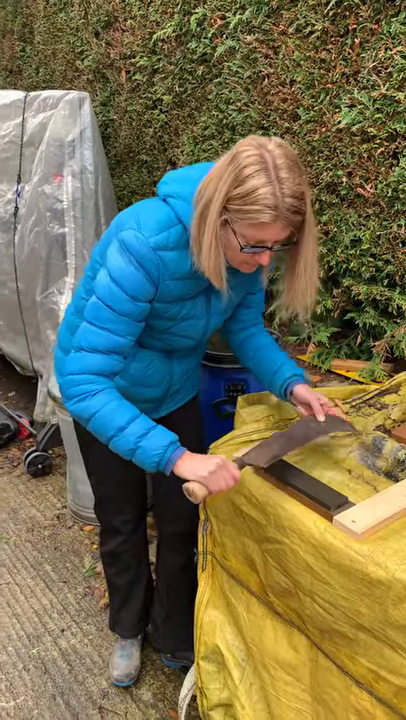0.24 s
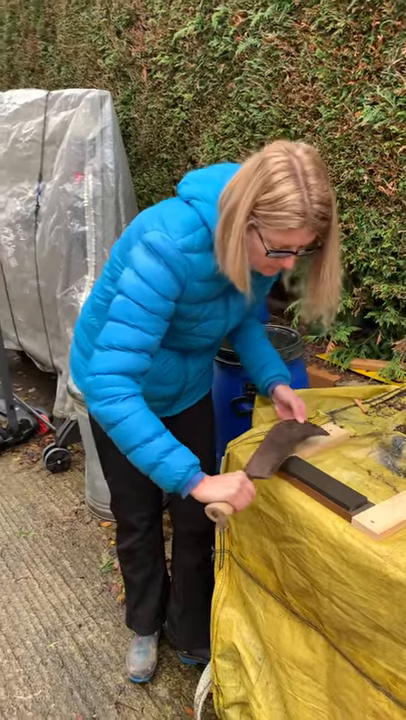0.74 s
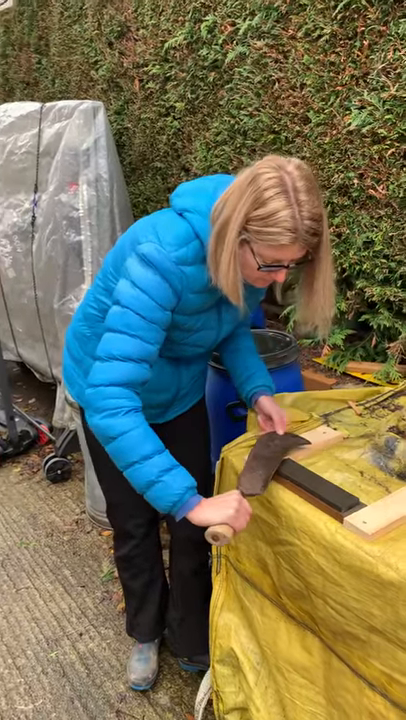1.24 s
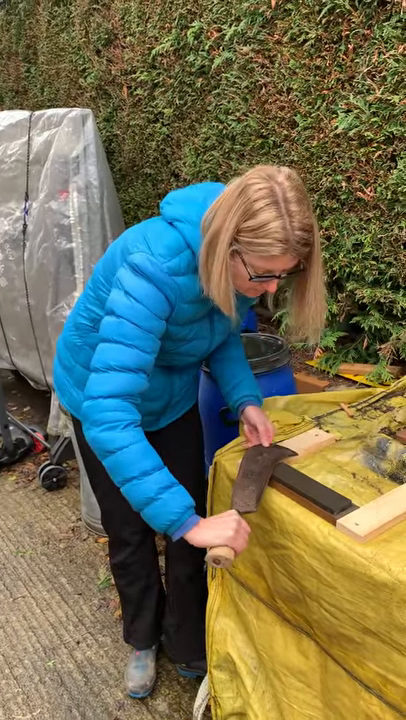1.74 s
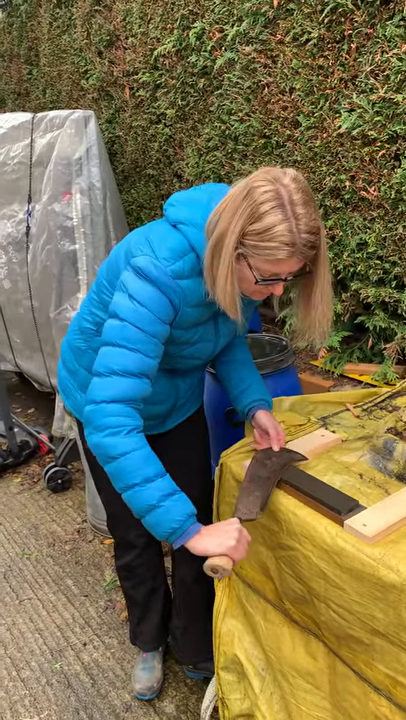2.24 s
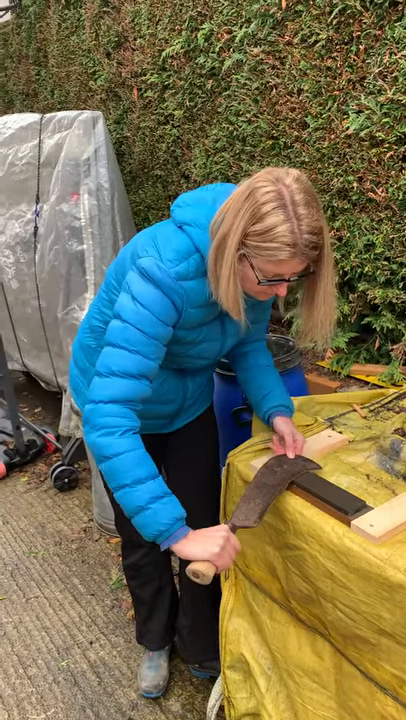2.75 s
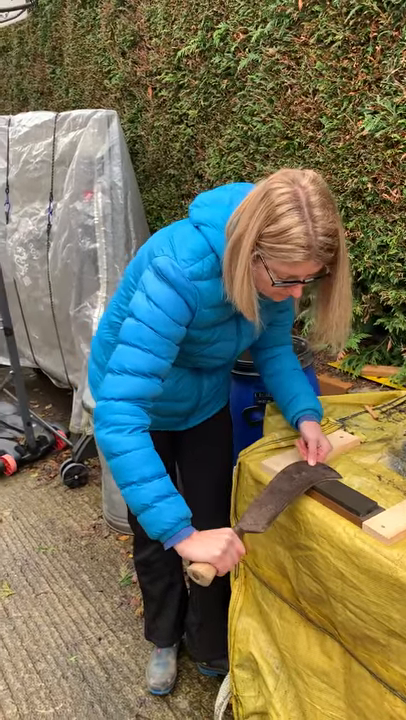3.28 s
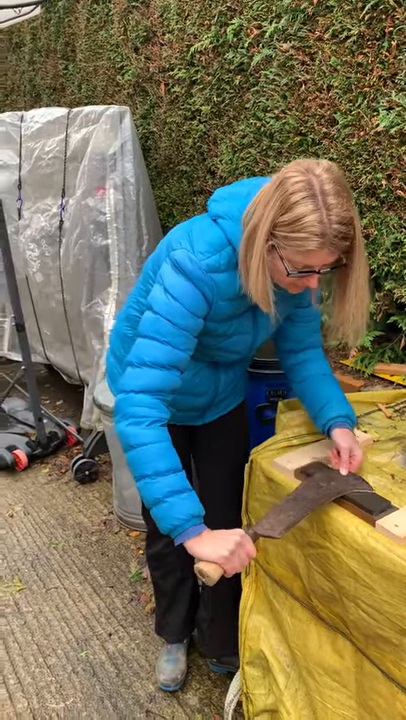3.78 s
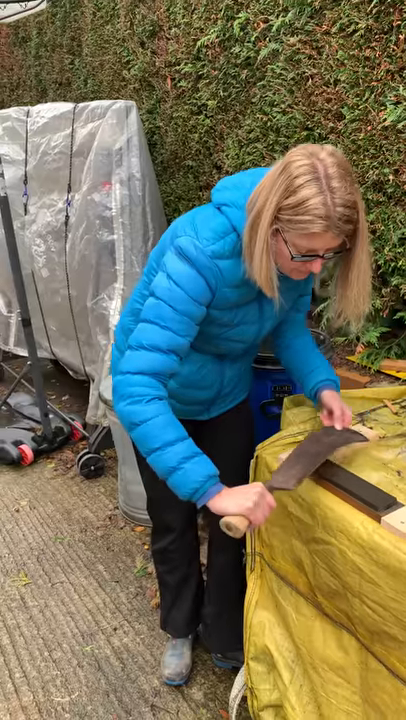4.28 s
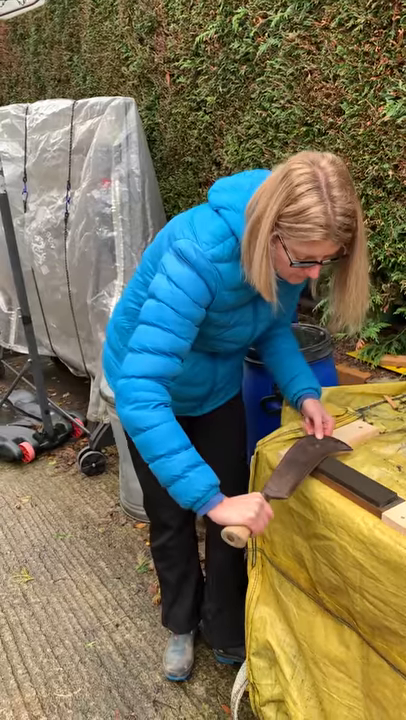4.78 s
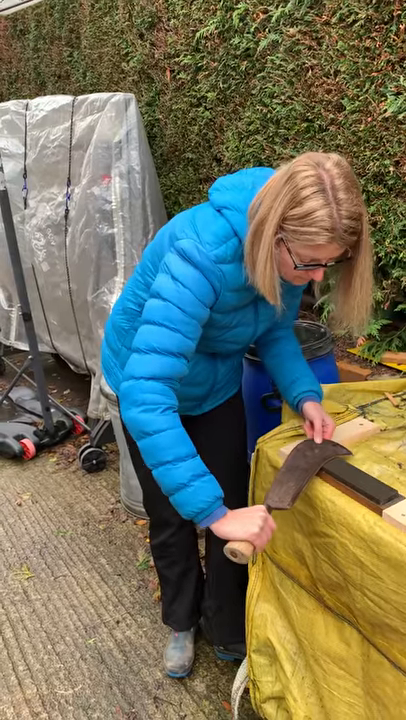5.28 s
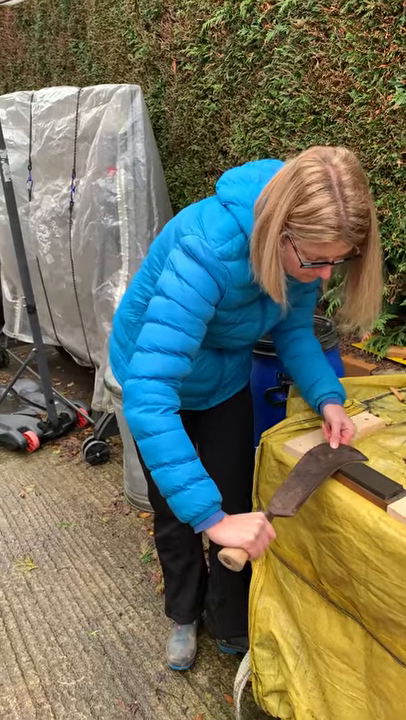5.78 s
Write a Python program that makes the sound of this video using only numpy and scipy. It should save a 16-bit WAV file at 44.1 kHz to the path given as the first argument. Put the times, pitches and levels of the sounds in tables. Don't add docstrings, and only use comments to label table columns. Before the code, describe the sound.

In a quiet yard with low traffic drone and soft hiss, a small bird chirps thinly. A steel blade clacks onto a sharpening stone, shifts lightly, then scrapes in short pushes that build into a long, bright, gritty rasp with metallic ringing and catches. After a brief gap and another chirp, a softer landing begins a second pass that grows loud. Close stereo phone pickup, dry open air with a very short echo.

```python
import sys
import numpy as np
from scipy import signal
from scipy.fft import rfft, irfft, next_fast_len
from scipy.io import wavfile
from scipy.ndimage import uniform_filter1d, map_coordinates

SR = 44100
rng = np.random.default_rng(int(sys.argv[2]) if len(sys.argv) > 2 else 0)


def elevation(decibels):
    levels = np.asarray(decibels, float)
    return 10 ** (levels / 20)


def generate_wav(sig):
    pcm = np.round(np.clip(np.atleast_2d(sig).T, -1, 1) * 32767).astype(np.int16)
    wavfile.write(sys.argv[1], SR, pcm)


N = 265702
TOP_HZ = 15720


def unit(x):
    return x / np.sqrt(np.mean(x ** 2) + 1e-20)


def along(points, hz):
    f, v = np.transpose(points)
    return np.interp(np.log(hz + 1), np.log(f + 1), v)


def curves(rows, silent=None):
    s, *cols = np.transpose(rows)
    return [np.interp(np.arange(N) / SR, s, c, silent, silent) for c in cols]


def wobble(rate):
    knots = rng.standard_normal(int(N * rate / SR) + 4)
    return map_coordinates(knots, [np.arange(N) * rate / SR])


def filtered(x, response):
    m = next_fast_len(N + 8192)
    return irfft(rfft(x, m) * response(np.fft.rfftfreq(m, 1 / SR)), m)[..., :N]


def narrow(hz, width):
    m = next_fast_len(N)
    f = np.fft.rfftfreq(m, 1 / SR)
    random_phase = 2j * np.pi * rng.random(len(f))
    return unit(irfft(np.exp(-((f - hz) / width) ** 2 + random_phase), m)[:N])


def ringing(force, modes, hollows, lo, hi):
    f = np.fft.rfftfreq(4096, 1 / SR)

    def mode(c, w):
        return 1j * f * w / (c * c - f * f + 1j * f * w)

    h = sum((-1) ** k * elevation(db) * mode(c, w) for k, (c, w, db) in enumerate(modes))
    for c, w, depth in hollows:
        h = h * (1 - np.clip(depth, 0, 1) * mode(c, w))
    in_band = (f > lo) & (f < hi)
    h = h / np.sqrt(np.sum(np.abs(h[in_band]) ** 2) / len(f))
    return signal.oaconvolve(force, irfft(h))[:N]


def tail(t60s, seconds):
    hz, t, z = signal.stft(rng.standard_normal((2, int(SR * seconds))), SR, nperseg=256)
    decay = elevation(-60 * t / along(t60s, hz)[:, None])
    echo = signal.istft(z * decay, SR, nperseg=256)[1]
    return echo / np.linalg.norm(echo[0])


# freq_hz, level_db per Hz
HISS = [(200, 9), (700, 4.5), (1600, 0.5), (2800, -6), (4800, -4.5), (8000, -4.5), (12500, -7.5),
        (15000, -11), (16000, -19.5)]
# freq_hz, likeness (0-1, below 0 counts as 0)
HISS_ALIKE = [(300, 0.075), (1000, -0.49), (2000, 0.28), (3500, -0.012), (4500, 0.93), (16000, 0.95)]


def hiss():
    def alike(hz):
        return np.clip(along(HISS_ALIKE, hz), 0, 1)

    shared, own = rng.standard_normal(N), rng.standard_normal((2, N))
    shared = filtered(shared, lambda hz: elevation(along(HISS, hz)) * np.sqrt(alike(hz)))
    own = filtered(own, lambda hz: elevation(along(HISS, hz)) * np.sqrt(1 - alike(hz)))
    return elevation(-74.5) * shared, elevation(-73.5) * own


# time_s, level_db
ROAD = [(0.0, -59.5), (0.28, -52.5), (0.59, -62), (0.69, -55), (1.07, -42), (1.34, -52.5), (1.78, -51.5),
        (2.52, -57), (3.34, -55.5), (3.46, -57), (3.56, -50.5), (3.82, -65.5), (4.19, -54.5), (4.8, -52.5),
        (5.2, -55), (5.5, -50.5), (5.72, -55.5), (6.02, -46)]
# freq_hz, level_db per Hz
DRONE = [(150, -39.5), (200, -11.5), (242, 0), (293, -7), (335, -22.5), (430, -27), (531, -41),
         (680, -71.5), (900, -87.5)]
# freq_hz, level_db per Hz
RUMBLE = [(15, -60), (25, -23.5), (50, -6.5), (84, 0.5), (150, 0), (200, -6), (300, -31), (500, -86.5)]


def road():
    drone_db, = curves(ROAD)
    lull = np.exp(-((np.arange(N) / SR - 3.91) / 0.64) ** 2)
    rumble_db = -57 - 6.5 * lull + 2.5 * wobble(4.0)
    throb = elevation(1.8 * wobble(22.01))
    drone = unit(filtered(rng.standard_normal(N), lambda hz: elevation(along(DRONE, hz))) * throb)
    rumble = unit(filtered(rng.standard_normal(N), lambda hz: elevation(along(RUMBLE, hz))))
    colours = lambda hz: elevation([along(DRONE, hz), along(RUMBLE, hz)])
    stray = filtered(rng.standard_normal((2, N)), colours)
    apart = np.array([[1], [-1]])
    drone = drone * elevation(.9 * apart) + elevation(-22) * unit(stray[0]) * apart
    rumble = rumble + elevation(-22) * unit(stray[1]) * apart
    return elevation(drone_db + 2.0) * drone + elevation(rumble_db + 2.5) * rumble


# centre_s, length_s, pitch_hz, width_hz, level_db
FAINT = [
    (.17, .3, 3650, 150, -93),
    (.16, .1, 4300, 300, -91),
    (4.14, .09, 1100, 450, -81),
    (4.51, .05, 1250, 250, -84),
]


def faint():
    t, sound = np.arange(N) / SR, np.zeros(N)
    for s, length, hz, width, db in FAINT:
        swell = np.exp(-(2 * (t - s) / length) ** 4)
        sound += elevation(db) * swell * narrow(hz, width)
    return sound


# time_s, pitch_hz, level_db
BIRD = [
    [(0.415, 5480, -80), (0.425, 5290, -57), (0.446, 5360, -54), (0.469, 5360, -54.5), (0.478, 5300, -57.5)],
    [(4.63, 5300, -86), (4.644, 5236, -64), (4.672, 5310, -57.5), (4.694, 5270, -60), (4.70, 5340, -61)],
]
RASP_DB = [-8, -8]


def bird():
    call, t = np.zeros(N), np.arange(N) / SR
    rasp = narrow(hz=5310, width=400)
    for rows, rasp_db in zip(BIRD, RASP_DB):
        hz, db = curves(rows)
        start, end = rows[0][0], rows[-1][0]
        open_bill = np.clip((end + .006 - t) / .006, 0, 1) * (t > start)
        rasp_swell = np.exp(-((t - end - .03) / 0.041) ** 2) * (t > start)
        call += open_bill * elevation(db + 11.0) * np.sin(2 * np.pi * np.cumsum(hz) / SR)
        call += elevation(db + rasp_db + 9.5) * rasp_swell * rasp
    echo = signal.fftconvolve(call[None], tail([(5000, 0.45)], .7), axes=1)[0, :N]
    wall = elevation(-6 + 3.0 * wobble(90)) * np.roll(call, round(0.072 * SR))
    tick = elevation(-55 - 60 * np.abs(t - .4255) / 0.0023) * rng.standard_normal(N)
    tick_colour = [(4000, -30), (4800, 3.5), (8000, -5), (9000, -25)]  # freq_hz, level_db
    tick = filtered(tick, lambda hz: elevation(along(tick_colour, hz)))
    return 0.41 * (call + wall) + elevation(-13.5) * echo + tick


# freq_hz, t60_s
YARD = [(300, 0.046), (2000, 0.18), (6000, 0.13), (12000, 0.084)]


def yard(steel):
    late = np.pad(steel, (500, 0))[None]
    return elevation(-15.5) * signal.fftconvolve(late, tail(YARD, .3), axes=1)[:, :N]


# start_s, peak_db, length_s
BURSTS = [(2.153, -63, 0.01), (2.216, -57, 0.013), (2.36, -62, 0.01), (2.392, -55, 0.01),
          (2.434, -49, 0.01), (2.643, -69, 0.0092), (2.768, -54, 0.01), (2.862, -55, 0.011),
          (2.94, -57, 0.01), (2.97, -57, 0.01), (3.007, -42, 0.01), (3.068, -51, 0.01), (3.1453, -60, 0.01),
          (3.249, -48, 0.011), (3.296, -50, 0.01), (3.45, -47, 0.01), (3.476, -45, 0.01),
          (4.89, -69, 0.011), (4.9187, -57.5, 0.01), (5.05, -65, 0.01), (5.1332, -66, 0.01),
          (5.157, -61, 0.012), (5.212, -48, 0.0089), (5.262, -63, 0.01), (5.285, -65, 0.01),
          (5.314, -53, 0.01), (5.432, -70, 0.01), (5.4445, -59, 0.0092), (5.6291, -48, 0.01),
          (5.819, -50.5, 0.0092), (5.882, -51, 0.0089), (5.8925, -48, 0.01), (5.9374, -42, 0.011),
          (6.002, -44.5, 0.01)]
# freq_hz, width_hz, level_db
BURST = [(1800, 1500, -5), (4100, 1800, -3), (7200, 2500, 0), (11400, 2500, -0.5), (13600, 2000, -2)]
# start_s, level_db, rattle_s, thud_db (re rattle)
LANDINGS = [
    (1.7572, -43.5, 0.011, -5),
    (4.7755, -52.5, 0.0048, -2.5),
]
# freq_hz, width_hz, level_db
SLAP = [(990, 500, -6.5), (1690, 400, -2.5), (2840, 330, 7), (3900, 390, -2.5), (5900, 580, -11.5),
        (7300, 600, -20)]
# freq_hz, width_hz, level_db
THUD = [(330, 140, 0), (630, 350, -6.5), (1300, 700, -9.5)]


def impacts():
    force, t = np.zeros((3, N + SR)), np.arange(SR // 10) / SR
    for s, db, length in BURSTS:
        crumble = elevation(db - 7.5 - 8.7 * t / length)
        force[0, round(s * SR):][:len(t)] += crumble * rng.standard_normal(len(t))
    for s, db, rattle, thud_db in LANDINGS:
        rattling = elevation(db - 7.2 * (t / rattle) ** 3)
        thudding = elevation(db + thud_db - 60 * t / 0.12)
        force[1, round(s * SR):][:len(t)] += rattling * rng.standard_normal(len(t))
        force[2, round(s * SR):][:len(t)] += thudding * rng.standard_normal(len(t))
    burst, slap, thud = force[:, :N]
    sound = ringing(burst, BURST, [], 7100, 15500)
    sound += ringing(slap, SLAP, [], 800, 4500)
    return sound + ringing(thud, THUD, [], 200, 1500)


def grit(per_s, spread_db, fine, clump_db, patchy_db):
    chance, size, sign = rng.random((3, N))
    snags = (chance < per_s / SR) * elevation(-spread_db * np.log(size + 1e-4)) * np.sign(sign - .5)
    rub = elevation(clump_db * wobble(120)) * (unit(snags) + fine * rng.standard_normal(N))
    z = signal.stft(rub, nperseg=512)[2]
    field = uniform_filter1d(uniform_filter1d(rng.standard_normal(z.shape), 5, 0), 12, 1)
    return unit(signal.istft(z * elevation(patchy_db * unit(field)), nperseg=512)[1][:N])


FULL_SPEED_DB = -50
# time_s, edge_db (speed as hiss), body_db (weight re hiss)
SETTLE = [
    [(1.72, -106, 14), (1.755, -82, 8), (1.758, -56, 1), (1.772, -70, 5), (1.807, -74.5, 2),
     (1.877, -84.5, 6)],
    [(1.879, -87, 1), (1.917, -72, -9), (1.945, -98, -13), (1.955, -72, -9), (1.995, -92, 1),
     (2.105, -102, -1)],
]
SHORT_PUSHES = [
    [(2.11, -83, -1), (2.154, -62, -1), (2.17, -62.5, 6.5), (2.184, -55, 3), (2.26, -68.5, -3),
     (2.306, -88, -13), (2.31, -80, -5)],
    [(2.312, -84, -2), (2.324, -70, 0), (2.378, -55.5, 1.5), (2.386, -59, 6), (2.456, -53, 0),
     (2.514, -65.5, 6.5), (2.598, -100, -10)],
    [(2.6, -104, -4), (2.634, -69, 0.5), (2.702, -61, 8), (2.842, -54, 0.5), (2.902, -59.5, -5),
     (2.91, -72, -1), (2.98, -55.5, -11)],
]
LONG_DRAW = [
    [(2.982, -62.5, -0.5), (3.016, -45, -10), (3.036, -53.5, 1), (3.086, -49.5, -2), (3.132, -57, -2),
     (3.26, -50, -1), (3.274, -54.5, 0.5), (3.318, -49, -1), (3.44, -50, -4)],
    [(3.442, -50, 1), (3.5, -42, -6.5), (3.682, -46.5, -3.5), (3.752, -52.5, -10), (3.836, -49, -14),
     (3.856, -81.5, -29), (3.882, -85, -28), (3.93, -99.5, -2)],
]
SECOND_PASS = [
    [(4.778, -58.5, 4.5), (4.796, -63, 1), (4.81, -61, -4), (4.896, -65, -1), (4.925, -55.5, -6),
     (5.044, -71, 1), (5.102, -62.5, -0.5), (5.32, -57.5, 0), (5.376, -67, 5.5)],
    [(5.378, -77, 1), (5.41, -60.5, 0.5), (5.482, -44.5, -5.5), (5.59, -50, 0.5), (5.7, -47, 1),
     (5.74, -51, 0.5), (5.93, -52, 1), (5.996, -55.5, -1), (6.025, -49.5, 2.5)],
]
BENCH_DB = [-0.5, -1.5, -4.5, -2, -2, 0.5, -6.5]
FINEST_DB = [-16.5, -13, -16.5, -10, -22.5, -16, -13.5]


def strokes(place):
    rub = np.zeros((4, N))
    rub[0] = grit(per_s=2500, spread_db=-0.5, fine=3.2, clump_db=1.6, patchy_db=2.5)
    rub[1] = grit(per_s=2900, spread_db=2.0, fine=1.03, clump_db=1.3, patchy_db=3.0)
    rub[2] = rng.standard_normal(N)
    rub[3] = rub[0]
    pressure = np.zeros((4, N))
    for rows in SETTLE + SHORT_PUSHES + LONG_DRAW + SECOND_PASS:
        edge_db, body_db = curves(rows)
        speed_db = edge_db - FULL_SPEED_DB
        bench_db = np.interp(place, range(len(BENCH_DB)), BENCH_DB) + body_db - 0.19 * speed_db
        top_db = np.interp(place, range(len(FINEST_DB)), FINEST_DB) - 0.036 * speed_db
        touching, = curves(np.c_[np.array(rows)[:, 0], np.ones(len(rows))], silent=0)
        shares_db = np.array([0 * edge_db, body_db - 2.5, bench_db, top_db])
        pressure += touching * elevation(edge_db + shares_db)
    return rub * pressure, pressure[0]


# start_s, peak_db, weight_db (re edge)
CATCHES = [(1.7577, -47.5, 7.5), (1.8903, -65, 3), (1.9128, -56.5, 2), (1.9535, -62, -19),
           (2.0476, -65, -19), (2.1774, -49.5, 5.5), (2.327, -59.5, 3), (2.6338, -64, -10),
           (2.7031, -42.5, -11), (2.8285, -38.5, -10), (2.8937, -55, -15), (3.0145, -39.5, -5),
           (3.068, -38.5, -4.5), (3.252, -28.5, -9), (3.3184, -35, -11.5), (3.5279, -39, -9),
           (3.5403, -32, -1), (3.5762, -31, -4.5), (3.8294, -37, -6.5), (4.7759, -45.5, 4),
           (4.8518, -49, -14), (4.9096, -40.5, -11), (5.3971, -56.5, -2), (5.475, -45, -16),
           (5.7194, -34.5, -1), (5.8192, -33, -8), (5.8922, -32, -32), (5.9369, -34, -23),
           (6.0038, -30.5, -14.5)]


def catches():
    force, t = np.zeros((6, N + SR)), np.arange(SR // 20) / SR
    for s, db, body_db in CATCHES:
        top_db = -19.5 - 0.28 * (db - FULL_SPEED_DB)
        chatter = elevation(-60 * t / 0.022) * rng.standard_normal((6, len(t)))
        shares_db = [-5, body_db - 11, body_db - 17.5, top_db, body_db - 10.5, top_db + 0.5]
        force[:, round(s * SR) - 30:][:, :len(t)] += elevation(db + np.array(shares_db))[:, None] * chatter
    return force[:, :N]


# time_s, place (0 heel, 1 belly, 2 bend, 3 tip; 4-6 heel, belly, bend, steeper)
CONTACT = [(1.7, 0.017), (2.28, 0.15), (2.36, 0.97), (2.9, 1.7), (3.05, 2.02), (3.4, 2.16), (3.5, 3.05),
           (3.9, 2.81), (4.7, 4.02), (5.05, 4.02), (5.2, 5.06), (5.38, 5.2), (5.46, 5.7), (5.75, 6.02),
           (6.03, 5.94)]
# freq_hz, width_hz, heel_db, belly_db, bend_db, tip_db
BLADE = [(884, 49, 10.5, 6.5, 1.5, -19), (1091, 27, -21, -16, 11.5, 7), (1452, 180, 17.5, 5, 6.5, -4.5),
         (1686, 46, 18.5, 8, 12, 6), (2156, 99, -16, 9.5, 14.5, 3.5), (2896, 46.5, 27.5, 4, 15.5, 2),
         (3330, 700, -7, -6, -9, -4), (3640, 35, -1, 4.5, 9, -4.5), (3846, 70, 17, 12, 5, 10),
         (4344, 66, -7, 3.5, 2.5, 6.5), (5140, 69, -1, 6, -0.5, -6), (5040, 200, 2, 9.5, 7.5, 13),
         (5254, 150, 0, -25, 5.5, 14.5),
         (5565, 52, 14.5, 2.5, 13.5, 9.5), (5906, 150, 10.5, 3, 6, 5.5), (6367, 100, -1, 6, 8.5, 12),
         (6596, 63, -6.5, 13, -12, 10.5), (6894, 77, -9, 2.5, 0, 14), (7410, 67, 7, -6, 4.5, 2),
         (7814, 100, -2, -34.5, 3.5, 12), (8370, 170, 3, -6, -1.5, 8.5), (9310, 184, -0.5, -5, -9, -1),
         (9890, 140, -5.5, -26, -3, -3), (10380, 149, -11.5, -2.5, -31, -6.5),
        (11100, 160, -24, -1, -15, -5), (11810, 240, -13, -11, -14.5, -7.5), (12690, 100, 1, -1.5, -16, -7),
        (13400, 360, -18, -11, -9, -11.5), (14650, 250, -11, -7.5, -11.5, -12),
        (15600, 310, -9.5, -7.5, -17, -13)]
# heel_db, belly_db, bend_db
STEEPER_DB = [(-4, -0.5, 0.35), (0.5, 3, 0.22), (-0.5, 2, -1.8), (-2.5, 0.5, -2), (0, -0.5, 0),
              (-2, -4.5, -0.44), (0.5, -1.5, 0.22), (-2, 1.5, 0.38), (-2, 2, 0), (-0.5, -0.5, 0.19),
              (-1.5, -1, 0), (0, -1.5, 0), (0.5, 1, 0), (-1, -1, 0.53), (2.5, 0, -0.28), (0, -1, -0.61),
              (1, 0.5, 0), (-1, 4.5, -0.37), (8, 2, 0), (6, 0, -0.72), (-1.5, -1.5, 0), (3, -2.5, 0.37),
              (1, 1, 0), (1.5, -2.5, 0), (0, 2, 0), (0.5, 4, 0), (0.5, -1, 0), (1, 2, 0), (-1, 3, 0),
              (1, -1, 0)]
# freq_hz, width_hz, depth (0-1) at heel, belly, bend, tip
HOLLOWS = [(1056, 88, 0.8, 0.97, 0.72, 0.89), (1743, 89, 0.1, 0.17, 1, 1), (2270, 290, 1, 0.56, .05, 0.06),
           (2580, 35, 0, 0.23, 0.19, 1)]
# freq_hz, width_hz, level_db
BENCH = [(353, 57.4, 5), (501.5, 22.2, 3), (556.4, 30, 0), (720, 61, -6), (809.3, 14, -3)]
CLACK = [(1503, 3500, 4.5), (3380, 2900, 3), (9000, 9000, -28)]
SPARK = [(4030, 2300, 4), (12800, 5000, 1)]
BROAD = [(4600, 450, 0), (8900, 800, -7)]


def blade():
    place, = curves(CONTACT)
    rubbing, edge_pressure = strokes(place)
    force = catches()
    force[:4] += rubbing
    edge, body, bench, top, clack, spark = force
    sound = ringing(bench, BENCH, [], 408, 750)
    sound += ringing(clack, CLACK, [], 1200, 4200)
    sound += ringing(spark, SPARK, [], 8900, 14000)
    sound += ringing(elevation(-12) * edge_pressure * rng.standard_normal(N), BROAD, [], 4200, 9400)
    modes, hollows = np.array(BLADE), np.array(HOLLOWS)
    modes = np.c_[modes, modes[:, 2:5] + STEEPER_DB]
    hollows = np.c_[hollows, hollows[:, 2:5]]
    low, high = modes[:, 0] < 3070, modes[:, 0] > 9400
    for k in range(modes.shape[1] - 2):
        share = np.sqrt(np.clip(1 - np.abs(place - k), 0, 1))
        shape, gaps = modes[:, [0, 1, k + 2]], hollows[:, [0, 1, k + 2]]
        sound += ringing(share * body, shape[low], gaps, 1000, 2700)
        sound += ringing(share * edge, shape[~low & ~high], gaps, 5430, 8010)
        sound += ringing(share * top, shape[high], [], 9600, 12400)
    return sound


# freq_hz, lead (radians)
LEAD = [(0, -3), (700, 1.47), (1600, 0), (2500, 1.42), (3200, 1.06), (4650, 3), (6800, 6.5), (15400, 19),
        (22050, 24)]
# freq_hz, level_db
LOUDER = [(60, -0.5), (230, 4), (400, -3), (750, -3), (1300, 0), (2400, 0.5), (2900, -4.5), (3500, 0),
          (16000, 0)]


def ports(x):
    side = np.array([[.5], [-.5]])

    def response(hz):
        lead = np.exp(1j * side * np.interp(hz, *np.transpose(LEAD)))
        return lead * elevation(side * along(LOUDER, hz))

    return filtered(x, response)


def scene():
    shared, own = hiss()
    steel = blade() + impacts()
    return ports(steel + bird() + faint() + shared) + yard(steel) + road() + own


def empty_masked(x, margin_db, up_db, down_db, budget_db, from_hz):
    hz, _, z = signal.stft([x[0] + x[1], x[0] - x[1]], SR, nperseg=2048)
    starts = np.r_[0, np.round(320 / 1.104 ** np.arange(24, 0, -1)), 320:1025:32].astype(int)
    widths = np.diff(starts, append=len(hz))
    power = np.add.reduceat(np.abs(z) ** 2, starts, axis=1) / widths[:, None] + 1e-30
    bark = 6 * np.arcsinh(hz[starts] / 600)
    above = bark[:, None] - bark[None]
    spread = elevation(-2 * (margin_db + np.where(above > 0, up_db * above, -down_db * above)))
    upper = (hz[starts] > from_hz) & (hz[starts] < TOP_HZ)
    average = np.exp(np.log(power.sum(0)[upper]).mean(0))
    threshold = spread @ power.sum(0) + elevation(-2 * budget_db) * average
    empty = (power < threshold) & upper[:, None]
    kept = z * np.repeat(~empty, widths, axis=1)
    mid, side = signal.istft(kept, SR, nperseg=2048)[1][:, :N]
    return np.array([mid + side, mid - side]) / 2


def top_cut(x):
    return signal.sosfilt(signal.butter(12, 16370, fs=SR, output="sos"), x)


def record(dry):
    limited = filtered(dry, lambda hz: hz < TOP_HZ)
    mix = empty_masked(limited, margin_db=12.5, up_db=19.5, down_db=24.5, budget_db=14.0, from_hz=1500)
    return top_cut(mix)


dry = scene()
out = record(dry)
generate_wav(out)
```